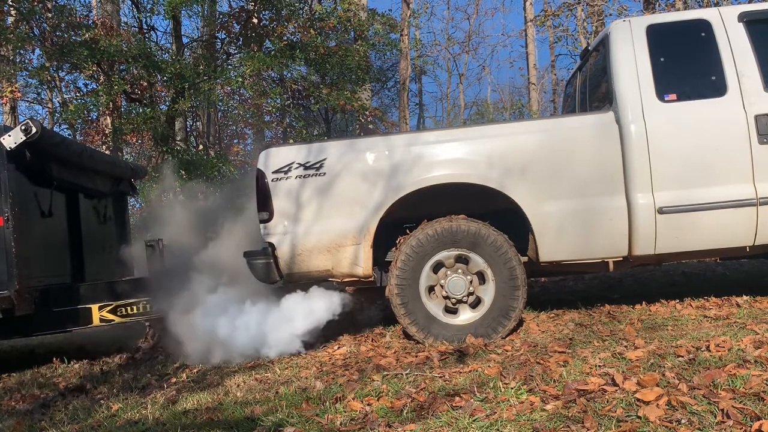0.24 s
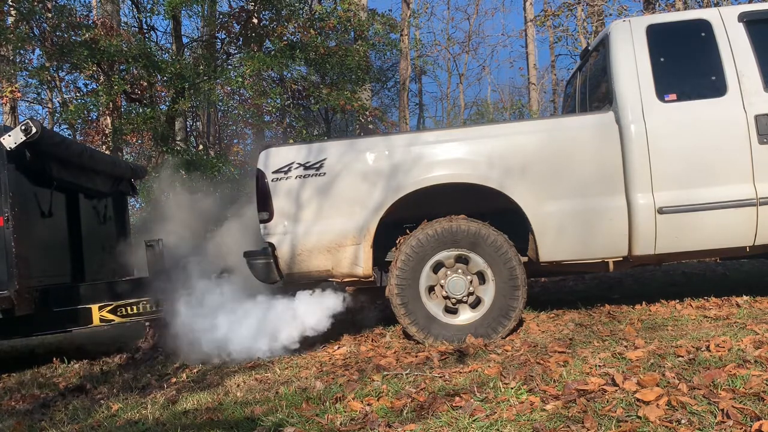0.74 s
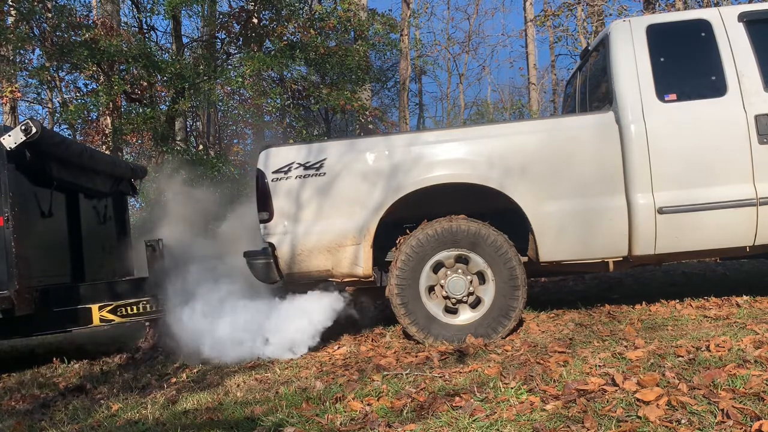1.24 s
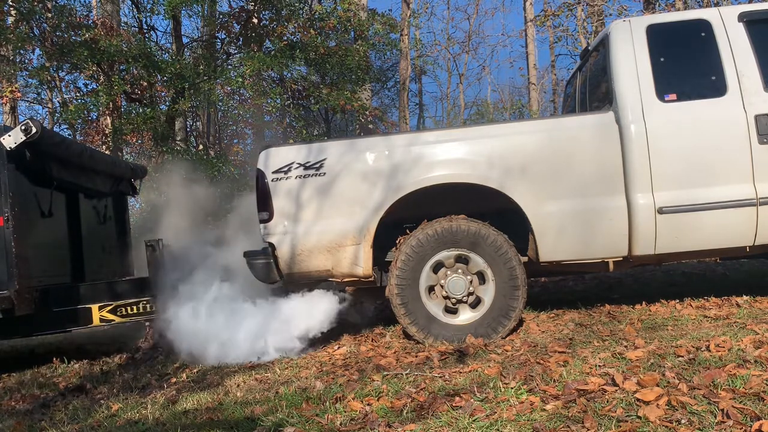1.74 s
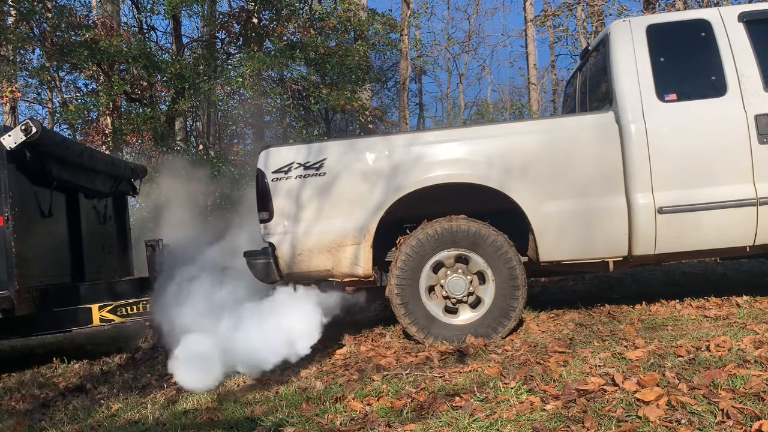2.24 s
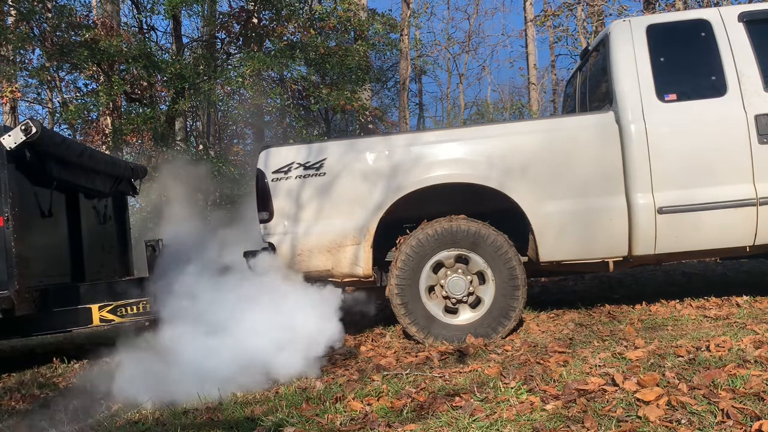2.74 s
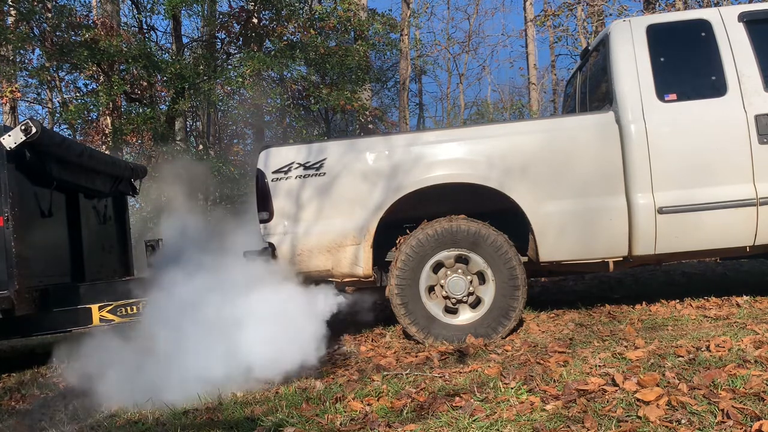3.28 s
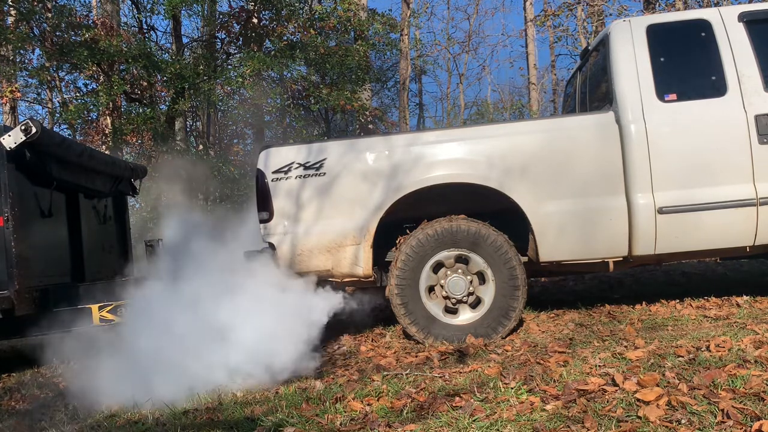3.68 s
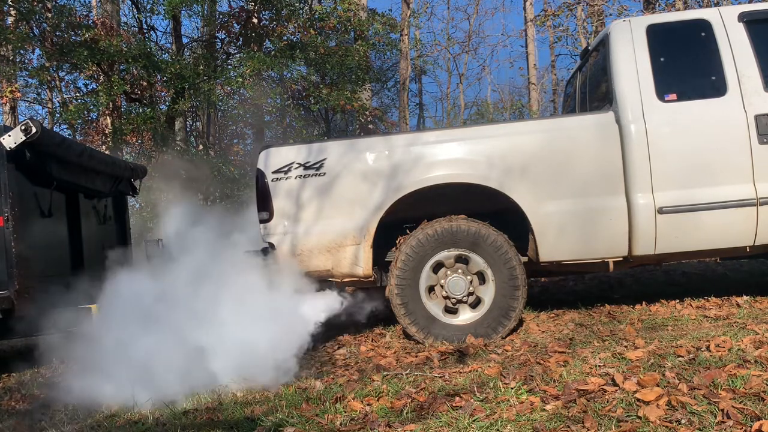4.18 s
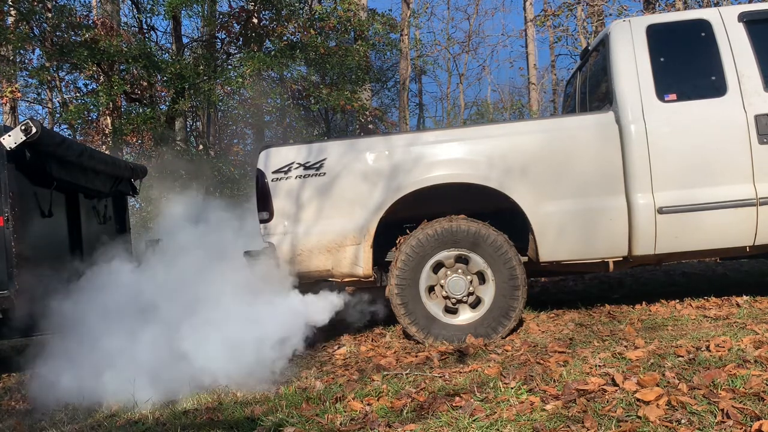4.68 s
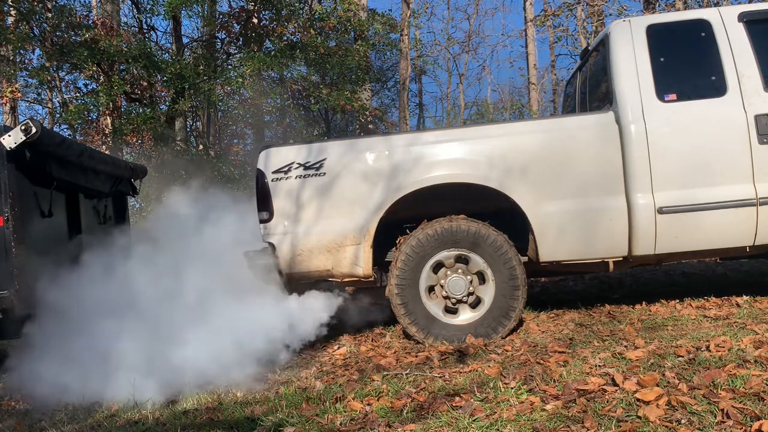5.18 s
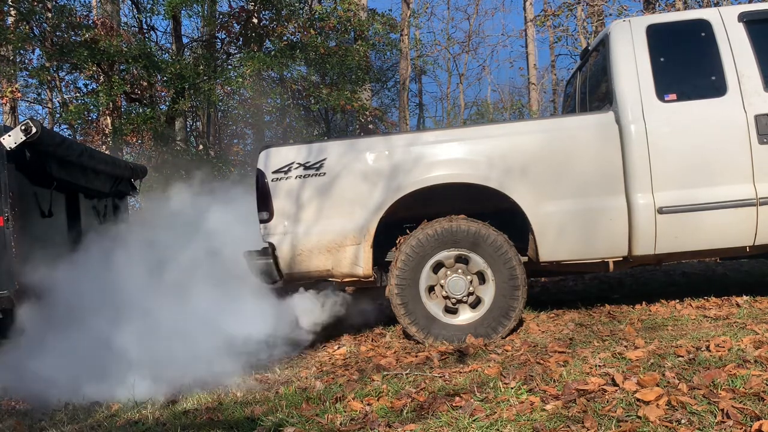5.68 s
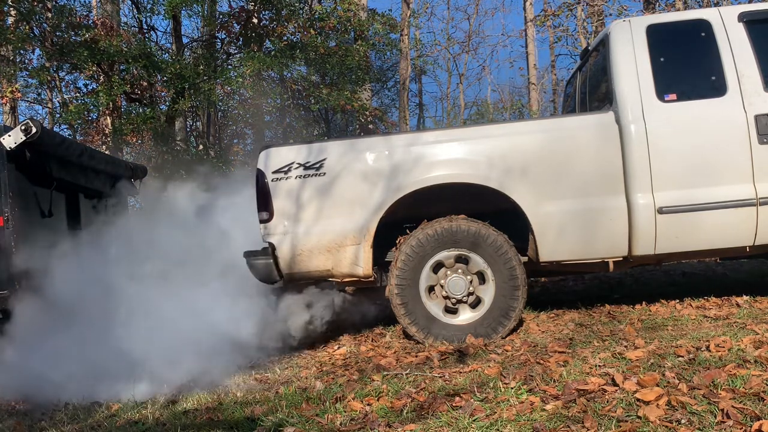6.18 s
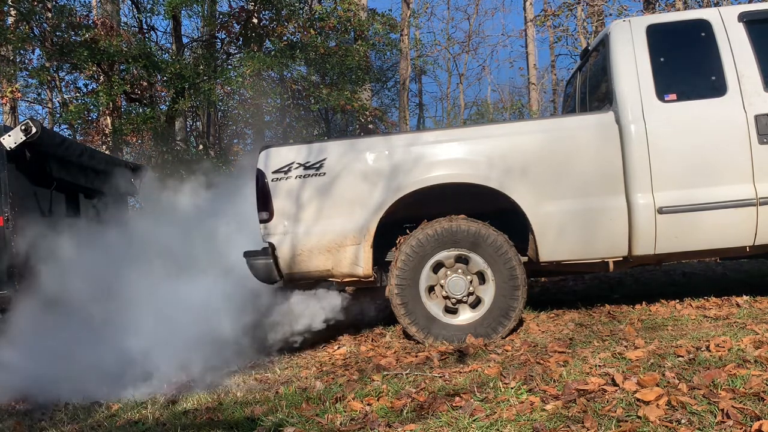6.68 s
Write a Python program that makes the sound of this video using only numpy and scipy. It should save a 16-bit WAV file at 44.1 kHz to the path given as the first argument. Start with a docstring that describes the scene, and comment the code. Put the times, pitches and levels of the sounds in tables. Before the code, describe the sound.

Close outdoor stereo sound of a large diesel pickup being cranked. The starter groans about eight times a second, each pulse dropping in pitch over metallic clatter. Around two seconds some cylinders fire with uneven knocks, exhaust puffs and short rising whines. It fails to run, and the heavy even cranking resumes to the end, with brief muffled dips.

```python
"""Cold diesel V8 on its starter, heard from beside it, the right port first. From the start each compression loads the
ring gear: a groan of falling pitch (swelling tone, overtone ticks) over a rush of streaky noise, pipe hum and hiss.
From 2 to 3 s cylinders catch: decaying noise knocks ring the block, rising sines are the starter whining free.
Then loaded cranking to the end, with a few stray knocks; four times from 3.6 s on the sound below the treble
drops out briefly."""
import sys
import numpy as np
from scipy import signal
from scipy.fft import rfft, irfft, next_fast_len
from scipy.io import wavfile
from scipy.ndimage import uniform_filter1d, map_coordinates

SR = 44100
rng = np.random.default_rng(int(sys.argv[2]) if len(sys.argv) > 2 else 0)


def store_pcm(level_fs):
    """Save levels as 16-bit WAV."""
    pcm = np.round(np.clip(level_fs, -1, 1) * 32767).astype(np.int16)
    wavfile.write(sys.argv[1], SR, np.atleast_2d(pcm).T)


N = 305172


def amp(db):
    """Gain of a dB value."""
    return 10 ** (np.asarray(db) / 20)


def unit(x):
    """x at rms 1."""
    return x / np.sqrt(np.mean(x ** 2) + 1e-20)


def bump(t, sigma):
    """Gaussian bell of height 1 around t = 0."""
    return np.exp(-.5 * (t / sigma) ** 2)


def along(points, hz):
    """(Hz, value) points interpolated on a log frequency axis."""
    f, v = np.transpose(points)
    return np.interp(np.log(hz + 1), np.log(f + 1), v)


def curves(rows):
    """One value per sample for each column after the time."""
    s, *cols = np.transpose(rows)
    return [np.interp(np.arange(N) / SR, s, c) for c in cols]


def wobble(knots_per_s):
    """Smooth random curve through normal knots."""
    knots = rng.standard_normal(int(N * knots_per_s / SR) + 4)
    return map_coordinates(knots, [np.arange(N) * knots_per_s / SR])


def filtered(x, response):
    """x times a complex response of frequency."""
    m = next_fast_len(N + SR // 2)
    return irfft(rfft(x, m) * response(np.fft.rfftfreq(m, 1 / SR)), m)[..., :N]


def resonance(hz, centre_hz, width_hz):
    """One causal resonance, gain 1 on top."""
    return 1j * hz * width_hz / (centre_hz ** 2 - hz ** 2 + 1j * hz * width_hz)


def rings(modes, hz):
    """Gain of a set of resonances over a flat base."""
    return 1 + sum(amp(db) * np.abs(resonance(hz, c, w)) ** 2 for c, w, db in modes)


# likeness of the two ports: (frequency [Hz], correlation [-1..1])
PORT_LIKENESS = [(100, 0.96), (330, 1), (700, 0.75), (1500, 0.74), (3000, 0.81), (6000, 0.63), (8800, 1),
                 (11000, 0.62), (14000, 1)]


def noise(gain, patchy_db, size=256):
    """Patchy stereo noise of rms 1, partly shared by the ports; a larger size makes thin, lasting streaks."""
    z = signal.stft(rng.standard_normal((2, N)), nperseg=size)[2]
    field = rng.standard_normal(z.shape[1:])
    field = uniform_filter1d(uniform_filter1d(field, 2, 0), 4, 1)
    pair = signal.istft(z * amp(patchy_db * unit(field)), nperseg=size)[1][:, :N]

    def mid_side(hz):
        turn = np.arccos(np.clip(along(PORT_LIKENESS, hz), -1, 1)) / 2
        return gain(hz) * [np.cos(turn), np.sin(turn)]

    mid, side = filtered(pair, mid_side)
    return unit(np.array([mid + side, mid - side]))


# compression strokes: (start [s], lull level [dB], rush level [dB], mesh pitch in mid-groan [Hz],
# then the groan, times from the start: onset [ms], steady level [dB], first swell [ms], its level [dB],
# second swell [ms], its level [dB])
STROKES = [(0.03, -29.0, -25.0, 306, 24, -20.0, 28, -15.0, 57, -15.5),
           (0.149, -31.0, -26.5, 315, 15, -22.0, 40, -17.5, 58, -12.5),
           (0.264, -34.0, -26.5, 323, 13, -26.0, 41, -19.0, 59, -12.5),
           (0.382, -37.5, -25, 341, 18, -29, 46, -9.5, 67, -13.5),
           (0.495, -33.0, -26.5, 335, 37, -19.5, 43, -14.0, 71, -15.0),
           (0.61, -31.5, -27.5, 351, 33, -21.5, 57, -16.0, 76, -12.5),
           (0.732, -33.0, -27.0, 341, 26, -24.5, 50, -18.5, 69, -12.5),
           (0.856, -33.5, -26.0, 333, 41, -17.5, 49, -13.0, 68, -16.0),
           (0.976, -30.5, -26.5, 337, 39, -19.0, 44, -13.5, 68, -15.0),
           (1.095, -32.5, -28.0, 345, 32, -22.5, 54, -14.5, 74, -14.5),
           (1.213, -35.0, -28.5, 348, 31, -23.5, 54, -18.0, 75, -13.0),
           (1.343, -36.5, -26.0, 340, 39, -19.0, 46, -10.5, 67, -15.5),
           (1.46, -32.0, -26.5, 336, 36, -18.0, 46, -12.5, 68, -14.5),
           (1.573, -34.5, -28.0, 349, 39, -21.0, 57, -16.5, 75, -17.0),
           (1.695, -34.0, -28.0, 343, 29, -23.5, 73, -12.5, 85, -19.5),
           (1.819, -34.0, -26.5, 334, 13, -28.5, 53, -19.0, 73, -17.0),
           (1.957, -36, -29, 673, 16, -51, 30, -44, 42, -41),
           (2.005, -26, -25.5, 742, 14, -45, 20, -30, 57, -30),
           (2.074, -31, -26.5, 689, 5, -47, 10, -42, 25, -37),
           (2.143, -31, -30, 716, 5, -37, 16, -26, 28, -38),
           (2.2, -34, -32.5, 729, 5, -58, 6, -50, 42, -32),
           (2.258, -41, -28, 631, 12, -34, 19, -25.5, 41, -28.5),
           (2.313, -35, -27.5, 633, 10, -39, 18, -36, 39, -28),
           (2.384, -38, -28.5, 385, 13, -29, 20, -18, 38, -20),
           (2.453, -38, -28, 368, 20, -27, 29, -19, 47, -16.5),
           (2.536, -35, -30, 332, 15, -30, 45, -8.5, 66, -17.5),
           (2.66, -33, -35, 381, 12, -45, 47, -41, 69, -37),
           (2.742, -36, -26.5, 372, 19, -29, 23, -23, 41, -18),
           (2.818, -34.5, -28.5, 353, 19, -28, 29, -24, 45, -11),
           (2.911, -32.5, -28.5, 329, 32, -24, 41, -13.5, 54, -21),
           (3.005, -33.0, -27.0, 341, 40, -21.0, 52, -18.5, 71, -16.5),
           (3.11, -39, -26, 341, 34, -22, 38, -21, 70, -13),
           (3.217, -34.5, -26.5, 337, 47, -17.5, 51, -16.5, 69, -12.5),
           (3.33, -35.0, -27.5, 338, 47, -18.5, 61, -14.5, 75, -20.0),
           (3.445, -33.5, -27.0, 340, 11, -28.5, 56, -15.0, 71, -16.0),
           (3.563, -31, -27.5, 324, 5, -37, 14, -30, 47, -12.5),
           (3.684, -32.5, -27.0, 330, 35, -20.5, 53, -17.0, 67, -14.5),
           (3.804, -35.5, -28.0, 331, 22, -25.0, 47, -20.0, 66, -13.5),
           (3.923, -34, -27.5, 325, 9, -30, 44, -21, 56, -12),
           (4.04, -35, -25.5, 320, 29, -23, 45, -14, 66, -15),
           (4.159, -33.0, -27.0, 323, 30, -21.0, 48, -17.5, 62, -14.5),
           (4.274, -34.0, -27.5, 328, 21, -24.5, 49, -20.0, 66, -14.5),
           (4.39, -33.5, -27.5, 329, 39, -22.0, 45, -20.5, 61, -14.0),
           (4.505, -32.5, -27.5, 335, 29, -27, 48, -21, 68, -22),
           (4.626, -31.5, -27, 335, 29, -26, 48, -19, 68, -21),
           (4.752, -35, -27.5, 329, 20, -34, 45, -27, 79, -26.5),
           (4.872, -35.0, -28.5, 327, 19, -32.0, 51, -22.5, 70, -18.0),
           (4.992, -37.0, -27.0, 338, 40, -22.0, 44, -18.5, 62, -15.5),
           (5.103, -34.0, -27.0, 342, 38, -19.0, 55, -14.0, 71, -16.0),
           (5.219, -33.5, -28.0, 344, 39, -19.5, 52, -16.0, 75, -14.0),
           (5.335, -34.5, -28.5, 338, 28, -24.0, 49, -19.5, 71, -13.0),
           (5.455, -34, -28, 335, 29, -27, 48, -22, 68, -17),
           (5.571, -29.5, -26.5, 350, 48, -18.5, 63, -12.5, 76, -14),
           (5.699, -32.5, -27.0, 337, 34, -20.5, 51, -17.0, 72, -16.0),
           (5.817, -35.5, -28.5, 339, 28, -22.5, 47, -19.5, 73, -13.0),
           (5.943, -35.5, -26.0, 331, 35, -19.5, 41, -13.0, 60, -11.0),
           (6.056, -35.0, -26.5, 330, 34, -19.5, 53, -12.5, 67, -15.5),
           (6.174, -34.0, -26.5, 335, 38, -20.0, 47, -14.0, 64, -16.5),
           (6.291, -35.5, -28.0, 332, 23, -23.0, 39, -17.5, 67, -13.0),
           (6.409, -34.5, -26.5, 337, 44, -17.5, 50, -15.0, 68, -12.0),
           (6.528, -34.5, -26.5, 338, 53, -15.5, 62, -11.0, 74, -14.5),
           (6.653, -35.0, -27.0, 336, 39, -20.0, 50, -13.0, 67, -15.5),
           (6.772, -34.5, -27.5, 336, 26, -22.0, 42, -16.0, 74, -14.0),
           (6.893, -35, -25, 287, 5, -45, 21, -26, 27, -48)]
# lull, full, still full, sagged: (share of the stroke [0-1])
RUSH_SHAPE = [0, .15, .42, .74]
RUSH_SAG_DB = 1.1


def stroke_level():
    """Level in dB: each stroke climbs out of a lull, holds and sags into the next."""
    s, lull, rush = np.transpose(STROKES)[:3]
    span = np.diff(s, append=s[-1] + np.median(np.diff(s)))
    times = s[:, None] + span[:, None] * RUSH_SHAPE
    levels = np.stack([lull, rush, rush, rush - RUSH_SAG_DB], axis=1)
    return np.interp(np.arange(N) / SR, times.ravel(), levels.ravel())


# far hiss of escaping gas before stroke breathing: (time [s], level [dB])
HISS_FLOW = [(0, -50), (1.91, -48.5), (2.02, -42), (2.05, -44.5), (2.23, -40), (2.44, -45), (2.47, -42),
             (2.62, -46), (2.77, -41.5), (2.81, -46), (3.93, -48), (6.92, -49)]
# hiss spectrum: (frequency [Hz], relative level [dB])
GAS_SPECTRUM = [(4000, -28), (7000, -16), (8000, -26), (9500, 14), (11500, 14), (12600, 11), (14000, 0),
                (15200, -72)]


def hiss(stroke_db):
    """Escaping gas: treble noise breathes with the strokes; a narrow band near its top swells faster."""
    flow_db = curves(HISS_FLOW)[0]
    level_db = flow_db + 0.77 * (stroke_db - np.mean(stroke_db))
    sheen_db = flow_db - 11.0 + 0.54 * (flow_db + 58)
    sheen = amp(sheen_db) * noise(lambda hz: resonance(hz, 11180, 840) ** 2, patchy_db=-3)
    gas = noise(lambda hz: amp(along(GAS_SPECTRUM, hz)), patchy_db=4.5, size=512)
    return amp(level_db + 0.79 * wobble(300)) * gas + sheen


# two lowest pipe modes, then the broad rumble: (centre [Hz], width [Hz])
PIPE_MODES = [(58, 44), (108, 16.4), (150, 160)]
# tailpipe puffs: (time [s], first mode level [dB], second mode level [dB])
PUFFS = [(.01, -45, -48), (.5, -55, -30.5), (.6, -51, -42), (1.46, -53, -35), (1.93, -51, -45),
         (2.04, -31, -31.5), (2.11, -26, -31.5), (2.18, -30, -28.5), (2.25, -44, -38), (2.32, -52, -41),
         (2.41, -44, -38), (2.47, -50, -37.5), (2.55, -39, -35), (2.64, -49, -35.5), (2.74, -47, -36),
         (2.83, -41, -39), (2.92, -50, -37), (3.0, -40, -32.5), (3.27, -52, -65), (5.1, -52, -35),
         (5.2, -49, -56), (6.07, -53, -31), (6.2, -47, -53)]
PUFF_SIGMA_S = 0.022
PIPE_DB = [[-50.5], [-52.5]]  # mean level of each mode between puffs
PIPE_EVEN = 0.36  # steadiness of the second mode's hum, 0-1


def tailpipe():
    """Unburnt gas pulses stir the two lowest modes of the pipe and a broad rumble above them."""
    low, high, broad = [unit(filtered(rng.standard_normal(N), lambda hz: resonance(hz, c, w) ** 2))
                        for c, w in PIPE_MODES]
    t = np.arange(N) / SR
    envelope = np.abs(signal.hilbert(high, next_fast_len(N))[:N])
    high = unit(high / (envelope + .1) ** PIPE_EVEN)
    gains = amp(PIPE_DB + 2.5 * np.array([wobble(23), wobble(12)]))
    for s, low_db, high_db in PUFFS:
        gains = gains + amp([[low_db], [high_db]]) * bump(t - s, PUFF_SIGMA_S)
    low_gain, high_gain = gains
    return low_gain * low + high_gain * (high + amp(-6) * broad)


# broad engine spectrum: (frequency [Hz], relative level [dB])
BLOCK_SPECTRUM = [(30, -28), (150, -8), (230, -5.5), (330, 7.5), (480, 2.5), (620, -5.5), (1000, -3.5),
                  (1700, -3), (2400, 3), (3300, -4), (4100, -9), (4700, -12.5), (5700, -16), (6500, -14),
                  (8000, -16), (12000, -34)]
# housing resonances: (centre [Hz], width [Hz], level over the flat base [dB])
HOUSING_MODES = [(300, 84, -1.5), (743.7, 9.7, 10.5), (936, 125, -0.5), (1058, 50, 1.5), (1119, 8, 5.5),
                 (1190, 8.3, -34), (1290, 9.3, 6), (1500, 24, 4.5), (1935, 120, -8.5), (2220, 10, 5),
                 (2400, 7, 2), (3326, 24, 0.5), (3532, 41, 3), (3838, 28, 0), (4137, 32, 4.5)]


def block_colour(hz):
    """The engine's broad spectrum with the housing resonances on top."""
    return amp(along(BLOCK_SPECTRUM, hz)) * rings(HOUSING_MODES, hz)


def clatter(stroke_db):
    """Valve train, gears and gas: streaky ringing noise, roughened by small contacts."""
    rough = amp(0.73 * wobble(40) + 0.78 * wobble(700))
    streaks = noise(block_colour, patchy_db=3.5, size=1024)
    return amp(stroke_db + 1.5) * unit(rough * streaks)


# starter whine while the load is off:
# (start [s], length [s], first pitch [Hz], last pitch [Hz], peak level [dB], peak at [share of the length])
WHINES = [(2.05, .15, 4670, 5930, -45, .5), (1.97, .085, 3600, 4680, -29, .7),
          (2.32, .07, 4000, 4670, -35, .6), (2.445, .04, 3900, 4280, -33, .45),
          (2.51, .04, 3250, 3880, -33, .6), (2.625, .09, 3200, 4550, -34, .6),
          (2.72, .048, 4380, 4820, -36, .5), (2.8, .05, 3700, 4300, -33, .6),
          (2.89, .04, 3350, 3800, -34, .5), (3.0, .045, 3300, 3800, -35, .45),
          (3.11, .04, 3300, 3750, -35, .45)]
WHINE_BEND = 0.57  # exponent below 1: the spin-up eases off
WHINE_PEAK_SIGMA = 0.42  # share of the length


def whine():
    """The unloaded armature spins up: a thin rising, fluttering whistle."""
    out = np.zeros(N)
    flutter, drift = wobble(90), wobble(500)
    for s, length, first_hz, last_hz, db, peak in WHINES:
        n = np.arange(round(s * SR), round((s + length) * SR))
        u = np.linspace(0, 1, num=len(n))
        hz = first_hz + (last_hz - first_hz) * u ** WHINE_BEND
        turn = 2 * np.pi * np.cumsum(hz) / SR + 0.7 * drift[n]
        level = amp(db) * bump(u - peak, WHINE_PEAK_SIGMA) * amp(3 * flutter[n])
        out[n] += level * np.sin(turn) * signal.windows.tukey(len(n), .2)
    return out


# combustion knocks: (time [s], relative level [dB], 60 dB decay [s], clank relative to the knock [dB])
KNOCKS = [(0.399, -17, 0.11, -10), (1.355, -18, 0.15, -21), (1.974, -8, 0.2, -3.5), (2.017, -12, 0.11, -3),
          (2.0944, -23, 0.2, -12), (2.2385, -10, 0.1, -11), (2.2674, -8, 0.15, -21), (2.324, -12, 0.28, -5),
          (2.3947, -10, 0.23, -27), (2.475, -7.5, 0.14, -22), (2.55, -11, 0.23, -17),
          (2.7134, -13.5, 0.19, -22), (2.759, -10, 0.16, -27), (2.836, -14.5, 0.33, -33),
          (2.923, -17, 0.11, -15), (3.1194, -35, 0.15, -12), (5.0014, -21, 0.19, -16),
          (5.956, -23, 0.15, -12)]
# what a knock rings: (centre [Hz], width [Hz], level over the flat base [dB])
LINER_MODES = [(506, 13, 20.5), (1350, 460, 9), (1920, 190, 5), (3440, 530, 5.5)]
# clank the knock rings from the block: (centre [Hz], width [Hz])
CLANK_RING = (2720, 80)


def knocks():
    """A cylinder lights: a sudden bright rattle through the block, at times with a clank."""
    level, t = np.zeros((2, N + SR)), np.arange(SR // 4) / SR
    for s, db, t60, clank_db in KNOCKS:
        shape = amp(db - 8.5 - 60 * t / t60) * (1 - np.exp(-t / 0.0005))
        at = round(s * SR)
        level[:, at:at + len(t)] += shape * amp([[0], [clank_db]])

    def bright(hz):
        tilt_db = along([(200, -7.0), (900, -5.0), (3000, -2.0), (12000, 4.5)], hz)
        return amp(along(BLOCK_SPECTRUM, hz) + tilt_db) * rings(LINER_MODES, hz)

    rattle = amp(0.57 * wobble(300)) * noise(bright, patchy_db=3.5, size=512)
    clank = noise(lambda hz: resonance(hz, *CLANK_RING) ** 2, patchy_db=6)
    return level[0, :N] * rattle + level[1, :N] * clank


FREE_HZ = 500  # mid-groan pitch from which the engine is pulling
SAG_HZ_PER_S, FREE_SAG_HZ_PER_S = 1800, 1140  # pitch fall under load; with the engine pulling
STALL_HZ = 272.5  # the pitch falls no lower
MID_GROAN_S = .055  # after the start of a stroke
SWELL_SIGMA_S, BITE_SIGMA_S = 0.0046, 0.0018
RING_T60_S, RING_DB = 0.082, 0.5  # ring after the second swell; its start relative to that swell


def groan():
    """Teeth mesh more slowly as the piston nears the top: a falling two-swell tone; ticks ring the housing."""
    tone, ticks = np.zeros((2, N + SR))
    shake, drift = np.pad([wobble(70), wobble(120)], ((0, 0), (0, SR)))
    orders, t = np.arange(2, 14)[:, None], np.arange(SR // 8) / SR
    for s, _, _, mid_hz, onset_ms, body_db, first_ms, first_db, second_ms, second_db in STROKES:
        at = slice(round(s * SR), round(s * SR) + len(t))
        onset, first, second = t - np.array([[onset_ms], [first_ms], [second_ms]]) / 1000

        body = amp(body_db) * bump(np.minimum(onset, 0), BITE_SIGMA_S)
        ring = amp(second_db + RING_DB - 60 * second / RING_T60_S)
        swells = amp(first_db) * bump(first, SWELL_SIGMA_S) + amp(second_db) * bump(second, SWELL_SIGMA_S)
        level = np.maximum(np.where(second < 0, body, ring), swells)
        level = uniform_filter1d(level, size=100)

        sag = SAG_HZ_PER_S if mid_hz < FREE_HZ else FREE_SAG_HZ_PER_S
        hz = np.maximum(mid_hz - sag * (t - MID_GROAN_S), STALL_HZ)
        turn = 2 * np.pi * np.cumsum(hz) / SR + rng.uniform(0, 2 * np.pi) + 0.14 * drift[at]
        octave = amp(-27.0 + 17 * np.log2(mid_hz / 335))  # a fast mesh rings harder
        mesh = np.sin(turn) + octave * np.sin(2 * turn)
        tone[at] += np.sqrt(2) * level * amp(0.59 * shake[at]) * mesh

        overtones = np.sin(orders * turn + rng.uniform(0, 2 * np.pi, orders.shape))
        overtones = overtones * amp(rng.normal(0, 2.8, orders.shape))
        ticks[at] += np.sqrt(level) * overtones.sum(axis=0)
    return tone[:N] + amp(-35.0) * unit(filtered(ticks[:N], block_colour))


# dropouts: (start [s], end [s], depth before the band's share [dB])
DROPS = [(3.621, 3.654, 19), (3.989, 4.167, 18), (4.546, 4.702, 17.5), (5.5, 5.607, 19)]
# (frequency [Hz], share of the depth [factor])
DROP_SHARE = [(200, 1.53), (400, 1.6), (900, 1.18), (1600, 0.75), (2500, 1.2), (3000, 1.74), (7600, 0.97),
              (8100, 0)]


def dropouts(x):
    """Everything under the treble sinks for a moment, each band by its own share."""
    hz, t, z = signal.stft(x, SR, nperseg=512, noverlap=384)
    depth_db = np.zeros(len(t))
    for start, end, db in DROPS:
        deepening = 0.73 + (t - start) / 0.17
        edges = np.minimum(t - start, end - t) / 0.02 + .5
        depth_db += db * np.clip(np.minimum(deepening, edges), 0, 1.1)
    gain = amp(-along(DROP_SHARE, hz)[:, None] * depth_db)
    return signal.istft(z * gain, SR, nperseg=512, noverlap=384)[1][:, :N]


# phase between the ports: (frequency [Hz], left lead [rad])
LEFT_LEAD = [(0, 0), (330, -.9), (600, -1.9), (800, -.9), (1100, -1.2), (1500, -1.9), (2410, -2.7),
             (4480, -7.1), (6290, -11.9), (7060, -12.9), (7750, -15.3), (9470, -16.2), (10400, -18.9),
             (11600, -18.8), (12500, -21.8), (14400, -22.1), (14700, -25.1), (15900, -25.1)]
# level between the ports: (frequency [Hz], left minus right [dB])
LEFT_TILT = [(60, 0.0), (110, 0.0), (200, 0.0), (380, 0.0), (700, -6.0), (1290, -4.0), (2380, -1.0),
             (4400, -2.5), (8120, -0.5), (15000, 0.0)]


def scene():
    """All sources summed; the engine reaches the right port first."""
    stroke_db = stroke_level()
    engine = groan() + whine() + clatter(stroke_db) + knocks() + tailpipe()
    mix = dropouts(engine) + hiss(stroke_db)
    f, lead = np.transpose(LEFT_LEAD)

    def left(hz):
        return amp(along(LEFT_TILT, hz) / 2) * np.exp(.5j * np.interp(hz, f, lead))

    return filtered(mix, lambda hz: np.array([left(hz), 1 / left(hz)]))


# mono bass, the groan spreads wide as the edge passes:
# (time [s], edge before jitter [Hz], side level under 450 Hz [dB])
MONO_EDGE = [(0, 685, 0), (.7, 597, -21), (1.3, 306, -32), (1.7, 190, -5), (1.85, 170, 7), (2.0, 161, -2),
             (2.6, 110, -1.5), (2.9, 30, 0.5), (4.6, 30, 0), (4.8, 170, 13), (5.1, 222, -4),
             (5.5, 308, -22), (5.8, 520, -5), (6.92, 586, 0)]


def narrowed(x):
    """Left and right become one below a drifting, jittering edge."""
    mid, side = (x[0] + x[1]) / 2, (x[0] - x[1]) / 2
    hz, t, z = signal.stft(side, SR, nperseg=2048, noverlap=1536)
    s, edge_hz, width_db = np.transpose(MONO_EDGE)
    jitter_db = 1.5 * wobble(20)[np.minimum(t * SR, N - 1).astype(int)]
    edge = np.interp(t, s, edge_hz) * amp(jitter_db)
    width = amp((hz[:, None] < 450) * np.interp(t, s, width_db))
    gain = (hz[:, None] > edge) * width
    side = signal.istft(z * gain, SR, nperseg=2048, noverlap=1536)[1][:N]
    return np.array([mid + side, mid - side])


TOP_HZ = 15750


def record(dry):
    """Narrows the bass and keeps nothing from the band limit up."""
    return filtered(narrowed(dry), lambda hz: hz < TOP_HZ)


dry = scene()
out = record(dry)
store_pcm(out)
```